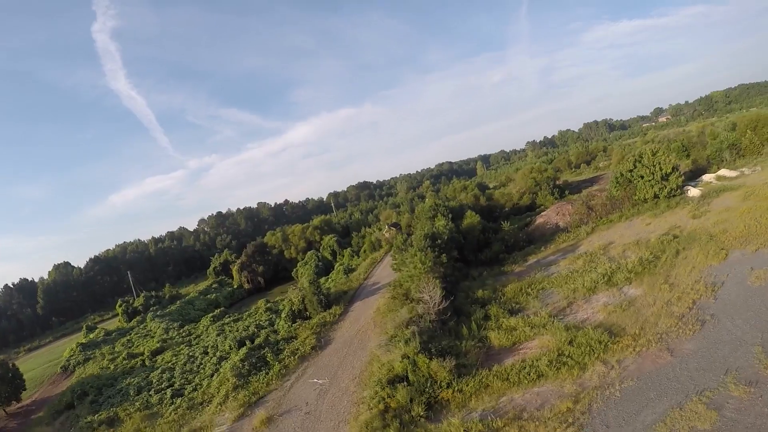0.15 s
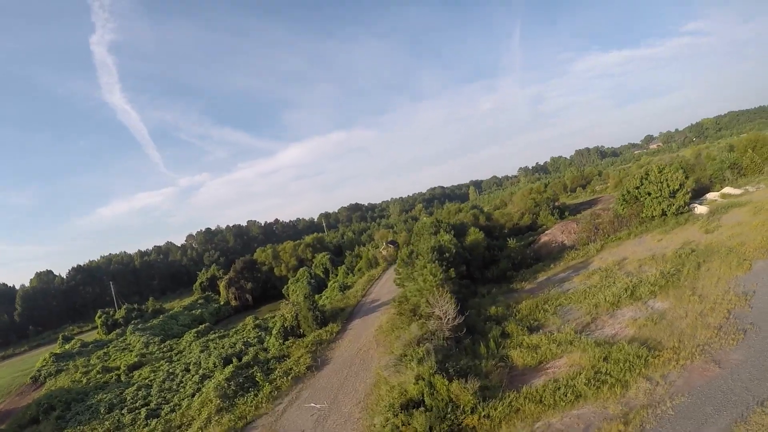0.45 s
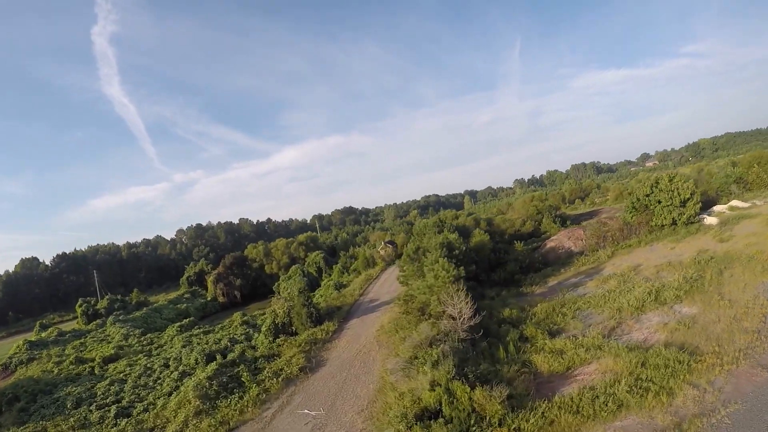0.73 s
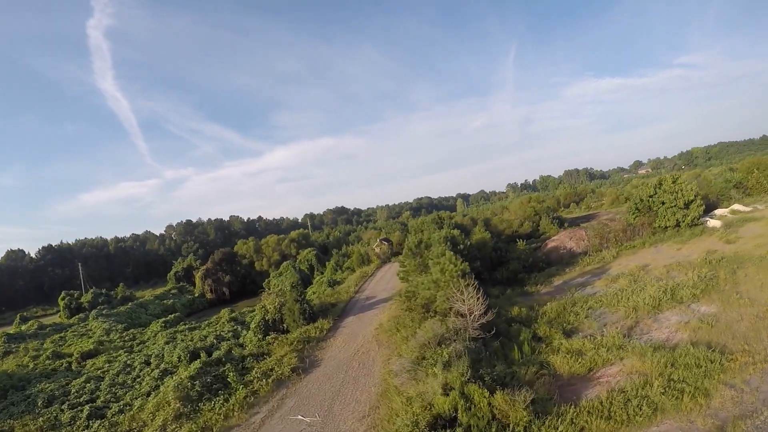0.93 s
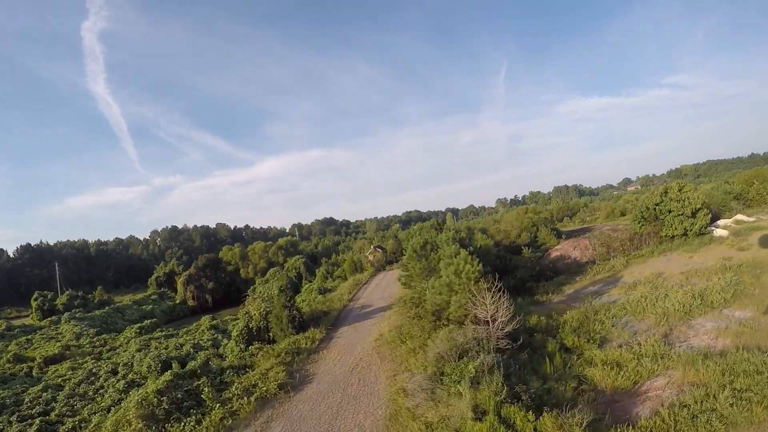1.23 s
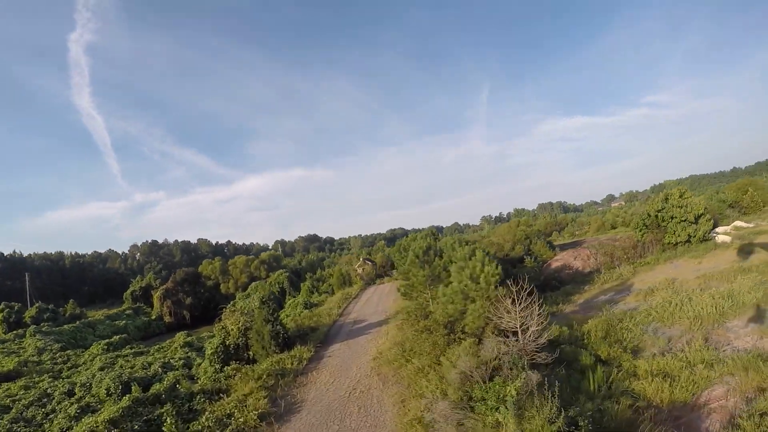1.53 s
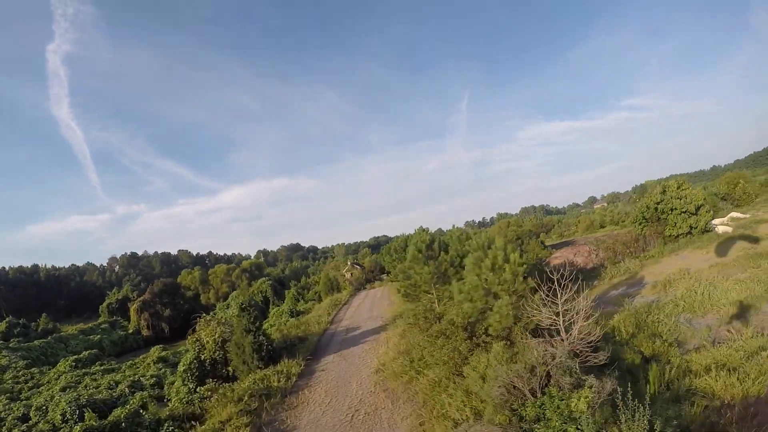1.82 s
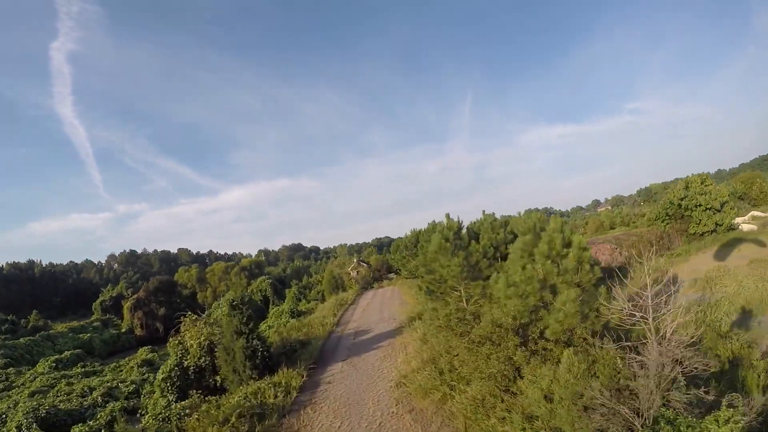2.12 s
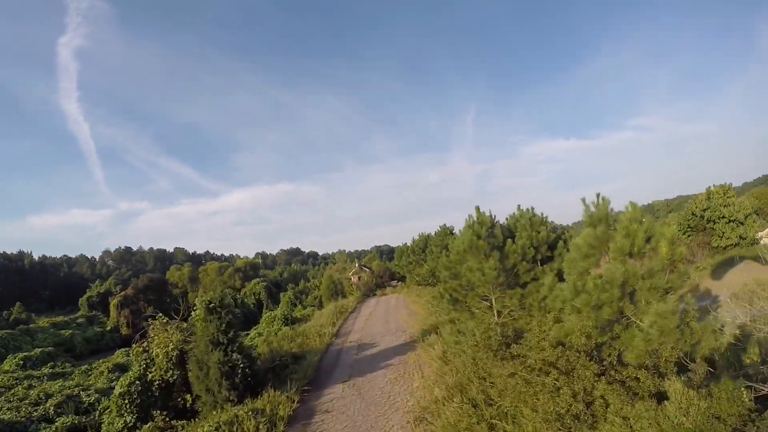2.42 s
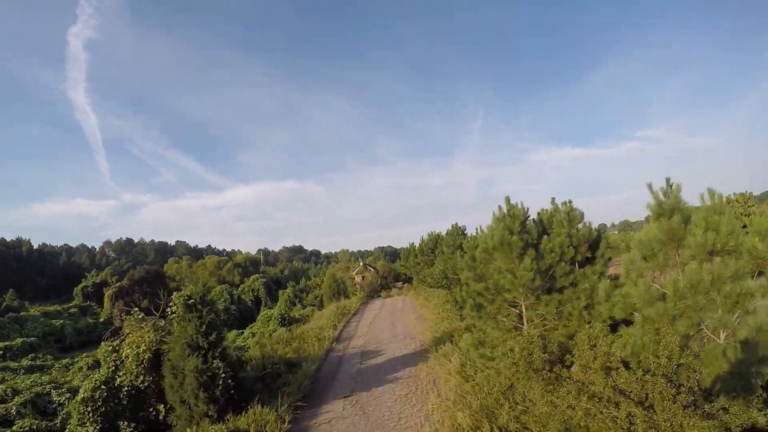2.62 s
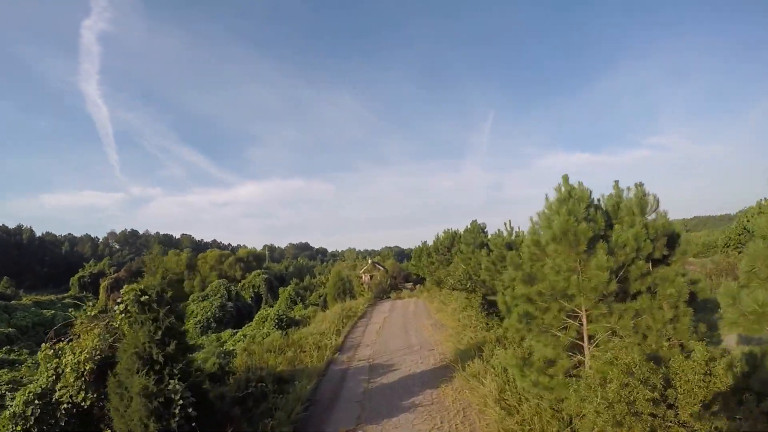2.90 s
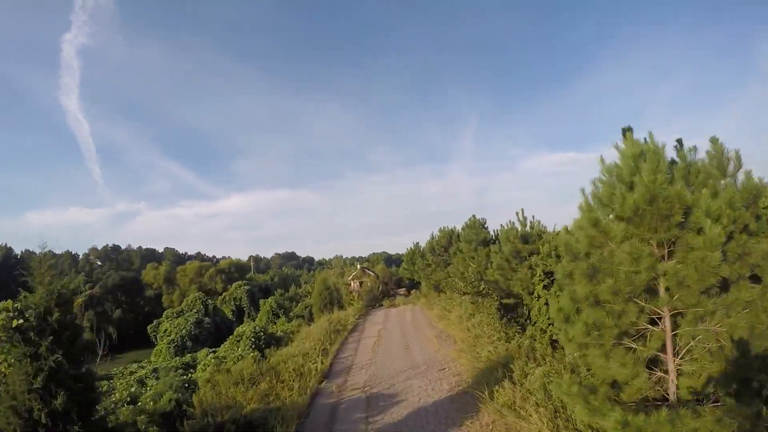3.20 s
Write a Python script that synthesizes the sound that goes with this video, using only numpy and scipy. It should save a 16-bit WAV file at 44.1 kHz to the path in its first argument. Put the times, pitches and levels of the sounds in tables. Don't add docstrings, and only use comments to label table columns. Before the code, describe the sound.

A small two-stroke engine behind a gliding pilot putters unevenly with spits and metallic pings under muffled wind; near two seconds it quickens into a quieter buzz, then weakens. Encased helmet microphone, outdoors, nearly mono.

```python
import sys
import numpy as np
from scipy import signal
from scipy.fft import rfft, irfft
from scipy.io import wavfile
from scipy.ndimage import uniform_filter1d

SR = 44100
rng = np.random.default_rng(int(sys.argv[2]) if len(sys.argv) > 2 else 0)


def transcribe(signal):
    frames = np.atleast_2d(signal).T
    limited = np.clip(frames, -1, 1)
    pcm = np.round(limited * 32767).astype(np.int16)
    wavfile.write(sys.argv[1], SR, pcm)


def voltage_ratio(level):
    return 10 ** (np.asarray(level, float) / 20)


N = 147735
COAST_END_S = 1.8

# (time [s], peak [dB], thump over spit [dB])
COAST_FIRINGS = [(0.0685, -37, 0), (0.1429, -32.5, 1), (0.2165, -36, 7), (0.2897, -41.5, 12),
                 (0.3414, -32, 4), (0.4159, -30, 5), (0.5108, -31.5, 3), (0.6101, -31.5, 2),
                 (0.7093, -39, 8.5), (0.7912, -31, -17), (0.8655, -35, 10.5), (0.9384, -32.5, 6.5),
                 (1.0157, -31.5, 1), (1.116, -33, 6), (1.1912, -31, 7), (1.264, -40.5, 10.5),
                 (1.3734, -35, 2), (1.4513, -39, 10), (1.5339, -44, 10), (1.6453, -48, 14), (1.709, -39, 7),
                 (1.7828, -47, 10)]
# (time [s], peak [dB], thump over spit [dB])
PULL_FIRINGS = [(1.8698, -40, 7.5), (1.9228, -40.5, 1.5), (1.973, -39, 1.5), (2.0194, -39.5, 1),
                (2.062, -39.5, 0), (2.1045, -41, 5.5), (2.1439, -41.5, 1.5), (2.1811, -41.5, 3),
                (2.2186, -41, 4), (2.2541, -41.5, 3), (2.2925, -40.5, 2.5), (2.3272, -40.5, 2.5),
                (2.3632, -43, 3.5), (2.3992, -43, 3), (2.4353, -44, 4.5), (2.4717, -41.5, 1),
                (2.5074, -42, 2), (2.543, -40, 1), (2.5779, -43.5, -1), (2.6133, -41, -7), (2.646, -44, -4),
                (2.68, -42.5, 1.5), (2.713, -44.5, 4), (2.7464, -42.5, -3), (2.7794, -42.5, 2)]
# (time [s], peak [dB], thump over spit [dB])
EASE_FIRINGS = [(2.8274, -44.5, 2), (2.8596, -49, 5), (2.891, -46.5, 2), (2.9236, -46.5, -6),
                (2.9558, -44, 0), (3.0011, -45.5, 6), (3.0453, -44, -1.5), (3.091, -47.5, 2),
                (3.1356, -49.5, 4.5), (3.1642, -55, -3), (3.1902, -56.5, 9), (3.2059, -48.5, 4.5),
                (3.264, -50, 4), (3.2902, -58.5, 8), (3.3345, -65, 1)]
# (time [s], speed [turns/s])
CRANK_SPEED = [(0, 40), (1.3, 39), (1.6, 35), (1.9, 38), (2.2, 55), (2.75, 61), (3, 66), (3.35, 66)]
# (frequency [Hz], level [dB], t60 [s])
MUFFLER_MODES = [(415.7, -6, 0.017), (315, -9, 0.015), (638, -17.5, 0.018), (1784, -26.5, 0.018)]
# (frequency [Hz], level [dB], t60 [s])
TAILPIPE_MODES = [(517, -16, 0.0081), (850, -5, 0.028), (1110, -3, 0.03), (1320, -6, 0.07),
                  (1410, -14, 0.03), (1720, -20, 0.025), (2924, -18, 0.03)]
# (frequency [Hz], level [dB], t60 [s])
BODY_MODE = (360, 4, .05)
SPIKE_TIMES = [2.1477, 2.1851, 2.2222, 2.2595, 2.2959, 2.3313, 2.3673, 2.403, 2.4393, 2.4751, 2.5115,
               2.5472, 2.5827, 2.6174, 2.6518, 2.6854, 2.7186, 2.7512, 2.7843, 2.8321, 2.864, 2.896, 2.9277,
               2.959, 3.0047, 3.0506, 3.095, 3.1395]
# (time [s], spike level [dB])
SPIKE_LOAD = [
    (0, -10),
    (2.11, -12),
    (2.14, -3.5),
    (2.6, -3),
    (3.35, -1),
]
# (time [s], level [dB])
POP_LEVEL = [(2.11, -70), (2.14, -42), (2.55, -42.5), (2.75, -47), (3.35, -50)]
# (time [s], lead [s])
BLOW_LEAD = [(1.75, .0012), (1.85, .0032)]
# (frequency [Hz], density [dB/Hz])
SPIT_SPECTRUM = [(300, 9), (1200, -6), (2500, -10), (5000, -11), (9000, -12), (12000, -17.5),
                 (15500, -21.5)]
# (frequency [Hz], level [dB], t60 [s])
TICK_MODES = [(2950, -6.5, 0.019), (4480, -20, 0.012), (5310, -6.5, 0.017), (5920, -9, 0.017),
              (7000, -6, 0.015), (9000, -7.5, 0.013), (10200, -7.5, 0.013), (12160, -13, 0.021)]
# (time [s], tick [dB], frame shake [dB])
TURN_LEVEL = [(0, -80, -63), (1.2, -50.5, -61), (1.6, -46, -50.5), (2.0, -54.5, -63), (3.35, -56.5, -66)]
# (time [s], peak [dB], frequency [Hz])
HIGH_PINGS = [(0.1092, -47, 9060), (0.2575, -44, 9500), (0.3421, -52, 9300), (0.3835, -53, 9150),
              (0.4114, -41, 8600), (0.5097, -54, 10100), (0.5541, -48, 8100), (0.5771, -53, 9000),
              (0.601, -47, 9000), (0.6544, -51, 8970), (0.6769, -48, 9440), (0.8325, -50, 9060),
              (0.9103, -49, 7940), (1.0814, -43, 9090), (1.2361, -49, 7840), (1.2855, -51, 8930)]
# (time [s], peak [dB], frequency [Hz])
MID_PINGS = [(0.1096, -44, 4480), (0.2214, -45, 7260), (0.2564, -46, 4000), (0.2678, -48, 4750),
             (0.3396, -44, 5750), (0.3865, -44, 4250), (0.4788, -47, 4830), (0.5112, -40, 6390),
             (0.5541, -49, 5400), (0.5771, -46, 4540), (0.61, -42, 6950), (0.654, -47, 4690),
             (0.6659, -48, 5160), (0.6764, -45, 4460), (0.7088, -53, 6060), (0.7203, -48, 4390),
             (0.7324, -47, 4720), (0.9098, -44, 5890), (1.082, -41, 4500), (1.1613, -41, 5300),
             (1.237, -39, 7200), (1.264, -41, 5840), (1.2855, -45, 4480), (1.3174, -48, 5890),
             (1.3438, -44, 5860)]
# (time [s], peak [dB], frequency [Hz])
LOW_PINGS = [(0.2064, -44, 2720), (0.2394, -48, 3110), (0.2564, -49, 3020), (0.3017, -43, 2460),
             (0.3864, -48, 3090), (0.4784, -43, 3060), (0.5534, -50, 2360), (0.6534, -49, 2970),
             (0.7064, -47, 2800), (0.8314, -51, 2700), (1.1604, -40, 2770), (1.2854, -49, 2540),
             (1.422, -46, 2690)]
# (time [s], wind [dB], hiss [dB], cavity [dB])
AIR_ONSET = [
    (.07, -48.5, -57, -51),
    (.13, -49.5, -57.5, -47),
    (.21, -49.5, -57, -45),
]
# (time [s], wind [dB], hiss [dB], cavity [dB])
AIR_LEVEL = [(0.25, -49, -56.5, -50.5), (0.53, -50, -55, -45), (0.59, -50.5, -56, -59),
             (0.67, -49.5, -56.5, -45), (0.72, -47, -56, -49), (0.79, -50, -56.5, -45),
             (1.14, -48.5, -56, -52.5), (1.18, -49, -56.5, -43), (1.5, -53.5, -61.5, -59.5),
             (1.52, -54, -61.5, -71), (1.85, -57, -65, -56.5), (2.22, -57, -65, -58),
             (2.81, -56.5, -67.5, -64), (3.01, -59, -66, -57), (3.06, -59.5, -67, -70),
             (3.3, -59.5, -69.5, -76)]
# (frequency [Hz], density [dB/Hz])
WIND_SPECTRUM = [(13, -31), (22, -14), (54, 3), (228, -2), (296, -0.5), (444, -4.5), (533, -5), (1090, -10),
                 (1800, -27), (2340, -41), (3960, -120)]
# (frequency [Hz], density [dB/Hz])
HISS_SPECTRUM = [(710, 4.5), (1200, -5), (1880, -3.5), (2770, -4), (3580, -5.5), (9170, -11.5),
                 (15500, -21.5)]
# (frequency [Hz], level [dB])
SIDE_SPECTRUM = [(60, -24.5), (110, -25), (200, -35.5), (380, -31.5), (700, -26), (1290, -26), (2380, -20),
                 (4400, -21), (8120, -20), (15000, -15)]
# (time [s], level [dB])
SIDE_TRIM = [(0, -1), (2.0, -1), (2.7, -4), (3.35, -4)]


def table(rows):
    return np.array(rows, float).T


def noise(points):
    hz, db = table(points)
    log_f = np.log(np.maximum(np.arange(N // 2 + 1) * SR / N, 1))
    knots = np.log(np.r_[hz[0] / 4, hz, hz[-1] * 4])
    db = np.interp(log_f, knots, np.r_[db[0] - 30, db, db[-1] - 40])
    x = irfft(rfft(rng.standard_normal(N)) * voltage_ratio(db), N)
    return x / x.std()


def ring(x, hz, t60_s):
    pole = np.exp(2j * np.pi * hz / SR - np.log(1000) / (t60_s * SR))
    return signal.lfilter([1], [1, -pole], x).imag


def clicks(times_s, sizes):
    x = np.zeros(N)
    np.add.at(x, np.clip((times_s * SR).astype(int), 0, N - 1), sizes)
    return x


def walk(rate_hz):
    k = int(SR / rate_hz)
    held = np.repeat(rng.standard_normal(N // k + 1), k)
    return 0.89 * uniform_filter1d(uniform_filter1d(held, k), k)[:N]


def crank_turns(fired_s):
    speed = np.interp(fired_s[1:], *table(CRANK_SPEED))
    per_gap = np.maximum(np.round(np.diff(fired_s) * speed), 1)
    count = np.r_[0, np.cumsum(per_gap)]
    return np.interp(np.arange(count[-1] + 1), count, fired_s)


def turn_phase(t, turn_times):
    return np.interp(t, turn_times, np.arange(len(turn_times)))


def thump(fired_s, db):
    pop_s, push_s, scatter_db, spike_late_s = 0.001, 0.0003, 0.5, 0.0042
    modes = list(MUFFLER_MODES) + list(TAILPIPE_MODES)
    chance = rng.standard_normal((len(fired_s), len(modes) + 1))
    sizes = voltage_ratio(db[:, None] + table(modes)[1] + scatter_db * chance[:, 1:]).T

    spikes = fired_s + spike_late_s
    known = np.array(SPIKE_TIMES)
    spikes[np.abs(spikes[:, None] - known).argmin(axis=0)] = known

    pop_size = voltage_ratio(np.interp(fired_s, *table(POP_LEVEL)) + chance[:, 0])
    out = np.convolve(clicks(spikes - pop_s / 2, pop_size), np.hanning(int(pop_s * SR)))[:N]

    lead_s = np.interp(fired_s, *table(BLOW_LEAD))
    for (hz, _, t60_s), size in zip(MUFFLER_MODES, sizes):
        blow = clicks(spikes - lead_s - 0.24 / hz, size)
        out = out + ring(ring(blow, hz, t60_s), hz, t60_s) * 40 / (t60_s * SR)

    push = np.hanning(int(push_s * SR) + 3)
    load = voltage_ratio(np.interp(fired_s, *table(SPIKE_LOAD)))
    for (hz, _, t60_s), size in zip(TAILPIPE_MODES, sizes[len(MUFFLER_MODES):]):
        spike = clicks(spikes - 0.25 / hz - push_s / 2, size * load)
        out = out + ring(np.convolve(spike, push / push.sum())[:N], hz, t60_s)
    return out


def spit(fired_s, db, thump_db):
    level_db, fall_s, tail_s, tail_db = -10.5, 0.0056, 0.0038, -8.5
    dull_hz, dull_from_db, load_bright_db = 4000, 5.5, 1.5
    before = 1500
    t = np.arange(-before, 4000) / SR
    gas = noise(SPIT_SPECTRUM) * voltage_ratio(0.81 * walk(300))
    low = signal.sosfiltfilt(signal.butter(2, dull_hz, fs=SR, output="sos"), gas)
    coast = fired_s < COAST_END_S
    top_db = np.where(coast, -np.maximum(thump_db - dull_from_db, 0), load_bright_db)
    starts = fired_s - 0.001 * coast
    out = 0
    # (firings, leak [s], leak [dB], rise [s], hold [s])
    for some, lead_s, lead_db, rise_s, hold_s in ((coast, 0.005, -8, 0.0019, 0.0069),
                                                  (~coast, 0.0014, -8, 0.0007, 0.004)):
        after = np.maximum(t - rise_s - hold_s, 0)
        fall = np.exp(-after / fall_s) + voltage_ratio(tail_db) * np.exp(-after / tail_s)
        leak = voltage_ratio(lead_db) * np.exp(np.minimum(t, 0) / lead_s)
        shape = fall * np.maximum(np.clip(t / rise_s, 0, 1), leak)
        for part, part_db in ((low, db), (gas - low, db + top_db)):
            bursts = clicks(starts, some * voltage_ratio(part_db + level_db))
            out = out + part * signal.fftconvolve(bursts, shape)[before:N + before]
    return out


def drone(t, turn_times):
    level_db, growth_db_s = -64, 3
    phase = turn_phase(t, turn_times) % 1
    gas = rng.standard_normal(N) * np.exp(-phase / 0.24)
    modes = list(TAILPIPE_MODES[1:]) + [BODY_MODE]
    hum = sum(voltage_ratio(db) * ring(gas, hz, t60_s) for hz, db, t60_s in modes)
    growth_db = growth_db_s * np.maximum(t - SPIKE_LOAD[3][0], 0)
    return hum / hum.std() * voltage_ratio(level_db + np.interp(t, *table(SPIKE_LOAD)) + growth_db)


def piston(t, turn_times):
    scatter_db, detune, late_s = 3, 0.025, 0.000684
    scrape_db, scrape_s = -15.5, 0.0031
    s, tick_db, shake_db = table(TURN_LEVEL)
    hz, mode_db, t60_s = table(TICK_MODES)
    chance = rng.standard_normal((len(turn_times), 3, len(hz)))
    out = np.zeros(N + 2000)
    age = np.arange(1000)[:, None] / SR
    for start, (size, tune, late) in zip(turn_times, chance):
        since = np.maximum(age - late_s * np.abs(late), 0)
        tones = np.sin(2 * np.pi * hz * (1 + detune * tune) * since)
        modes = voltage_ratio(mode_db + scatter_db * size) * tones * 1000. ** (-since / t60_s)
        scrape = np.diff(rng.standard_normal(1001)) * np.exp(-age[:, 0] / scrape_s)
        scrape = scrape * voltage_ratio(scrape_db + scatter_db * size[0])
        level = voltage_ratio(np.interp(start, s, tick_db))
        out[int(start * SR):][:1000] += level * (modes.sum(axis=1) + scrape)
    shake = voltage_ratio(np.interp(t, s, shake_db) + 2.0 * walk(9.6))
    return out[:N] + shake * np.sin(2 * np.pi * turn_phase(t, turn_times))


def pings():
    level_db, rise_s, t60_s, roughness, glide = -1, 0.001, 0.014, 1.2, 0.051
    out = np.zeros(N + 1000)
    age = np.arange(1000) / SR
    rattle = walk(2000)
    shape = np.clip(age / rise_s, 0, 1) * 1000. ** (-age / t60_s)
    bend = 1 + glide * (age / 0.0072 - 0.5)
    for s, db, hz in list(HIGH_PINGS) + list(MID_PINGS) + list(LOW_PINGS):
        start = int(s * SR)
        rough = 1 + roughness * rattle[start:][:1000]
        out[start:][:1000] += voltage_ratio(db + level_db) * shape * rough * np.sin(2 * np.pi * hz * age * bend)
    return out[:N]


def gusty_bands(points, low_hz, high_hz, gust_db):
    flicker_db, buffet_hz, buffet_fade_db_s = 2, 45, -4
    spectrum = rfft(noise(points))
    octave = np.log2(np.arange(N // 2 + 1) * SR / N + 1)
    out = 0
    for centre in np.arange(np.log2(low_hz), np.log2(high_hz), 0.5):
        weight = np.cos(np.pi * np.clip(octave - centre, -0.5, 0.5)) ** 2
        fade_db = buffet_fade_db_s * np.arange(N) / SR / (1 + (2 ** centre / buffet_hz) ** 4)
        out = out + irfft(spectrum * weight, N) * voltage_ratio(gust_db + fade_db + flicker_db * walk(14))
    return out


def cavity_ring(t):
    width_hz, steadiness, low_db, low_fade_db_s = 25, 0.9, 1.5, -9
    high, low = [ring(rng.standard_normal(N), hz, 2.24 / width_hz) for hz in (309.8, 130)]
    high = high / np.abs(signal.hilbert(high)) ** steadiness
    return high / high.std() + low / low.std() * voltage_ratio(low_db + low_fade_db_s * t)


def air(t, turn_times):
    s, wind_db, hiss_db, cavity_db = table(list(AIR_ONSET) + list(AIR_LEVEL))
    gust_db = 1.38 * walk(6.07)
    wind = gusty_bands(WIND_SPECTRUM, 11.9, 4000, gust_db) * voltage_ratio(np.interp(t, s, wind_db) + 4.5)
    hiss = gusty_bands(HISS_SPECTRUM, 505, 22000, gust_db)
    puff_db = -0.5 * np.cos(2 * np.pi * turn_phase(t, turn_times) - 1.0)
    crackle_db = 2.5 * walk(150)
    hiss = hiss * voltage_ratio(np.interp(t, s, hiss_db) + 2.5 + puff_db + crackle_db)
    cavity = cavity_ring(t) * voltage_ratio(np.interp(t, s, cavity_db) + 0.34 * gust_db)
    return wind + hiss + cavity


def side_signal(t, mid):
    patch_db = 4.5
    smear = rng.standard_normal(1200)
    side = signal.fftconvolve(mid, smear / np.sqrt(np.sum(smear ** 2)))[600:N + 600]
    hz, side_db = table(SIDE_SPECTRUM)
    log_f = np.log(np.arange(N // 2 + 1) * SR / N + 1)
    side = irfft(rfft(side) * voltage_ratio(np.interp(log_f, np.log(hz), side_db)), N)
    return side * voltage_ratio(np.interp(t, *table(SIDE_TRIM)) + patch_db * walk(14))


def scene():
    start_s, fade_in_s, self_noise_db = 0.051, 0.0071, -68
    t = np.arange(N) / SR
    fired_s, db, thump_db = table(list(COAST_FIRINGS) + list(PULL_FIRINGS) + list(EASE_FIRINGS))
    turn_times = crank_turns(fired_s)
    blow_db = db + thump_db - 3.5 - 2 * (fired_s < COAST_END_S)
    mid = thump(fired_s, blow_db) + spit(fired_s, db, thump_db)
    mid = mid + pings() + piston(t, turn_times)
    mid = mid + air(t, turn_times) + drone(t, turn_times)
    mid = mid + voltage_ratio(self_noise_db) * rng.standard_normal(N)
    stereo = mid + side_signal(t, mid) * np.array([[1], [-1]])
    return stereo * np.clip((t - start_s) / fade_in_s, 0, 1)


def band_limit(x):
    return signal.sosfilt(signal.butter(12, 16350, fs=SR, output="sos"), x)


def record(dry):
    bass_hz, top_hz = 42, 15400
    dropout_s, dropout_length_s, dropout_hz, dropout_db = 3.3215, 0.0105, 1600, -16
    x = signal.sosfilt(signal.butter(2, bass_hz, "high", fs=SR, output="sos"), dry)
    x = signal.sosfilt(signal.ellip(10, 0.2, 70, top_hz, fs=SR, output="sos"), x)
    gap = np.abs(np.arange(N) / SR - dropout_s) < dropout_length_s / 2
    treble = signal.sosfiltfilt(signal.butter(4, dropout_hz, "high", fs=SR, output="sos"), x)
    mix = x - treble * (1 - voltage_ratio(dropout_db)) * uniform_filter1d(1. * gap, size=60)
    return band_limit(mix)


dry = scene()
out = record(dry)
transcribe(out)
```